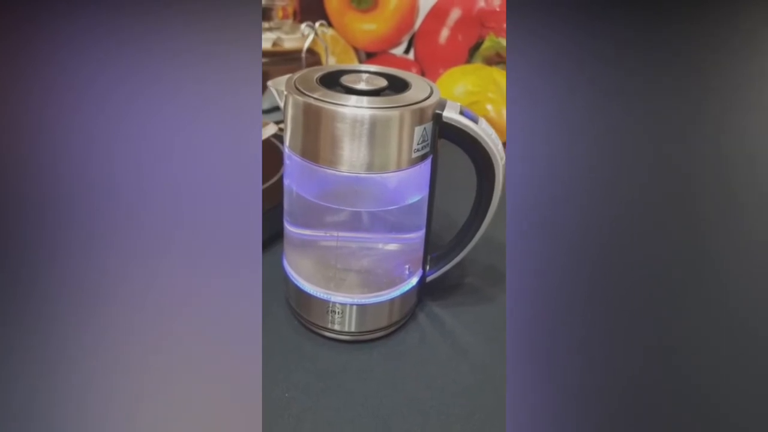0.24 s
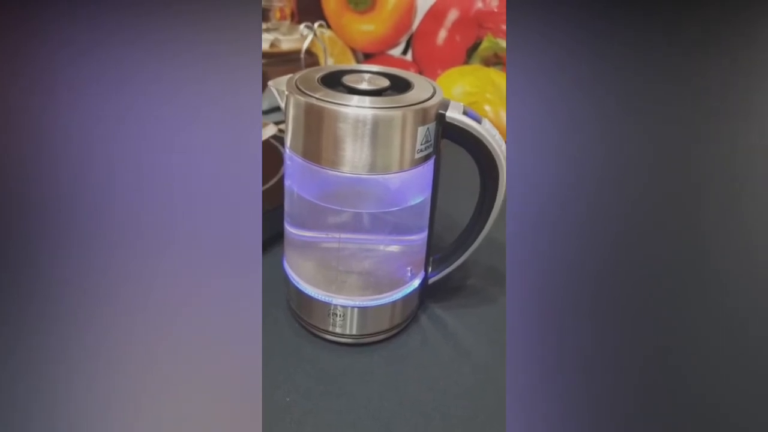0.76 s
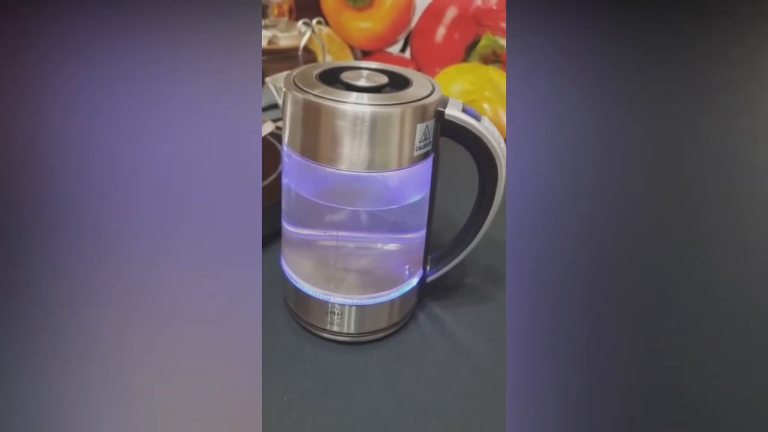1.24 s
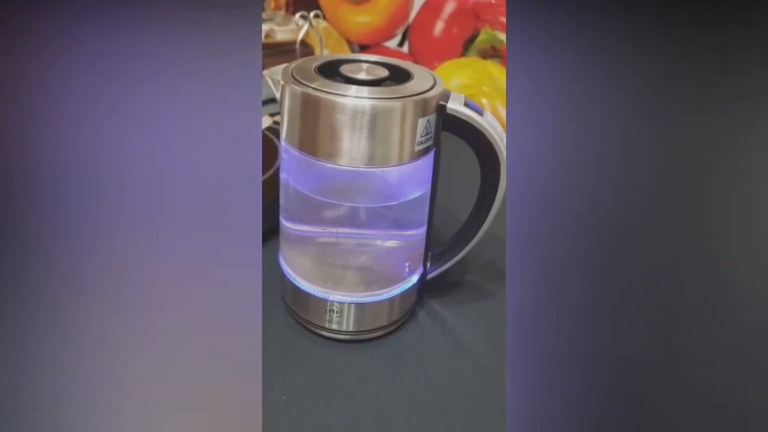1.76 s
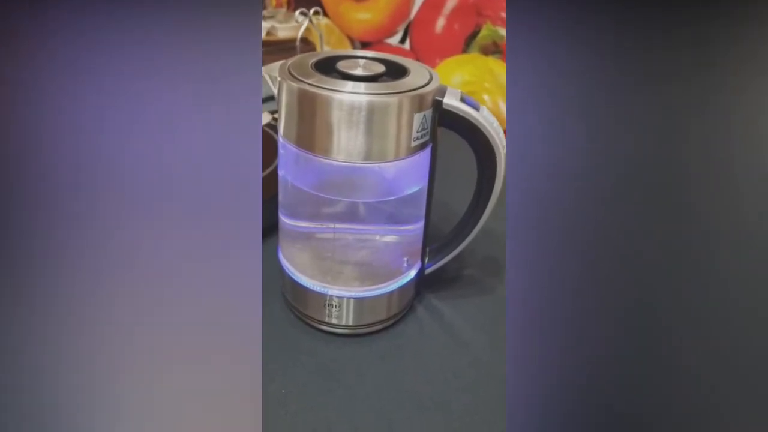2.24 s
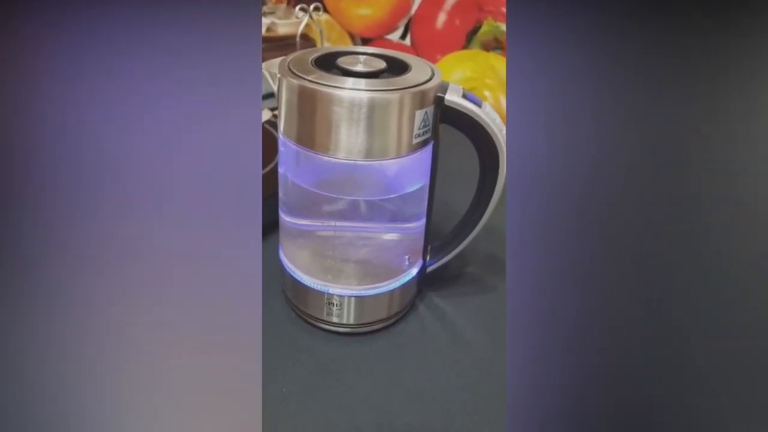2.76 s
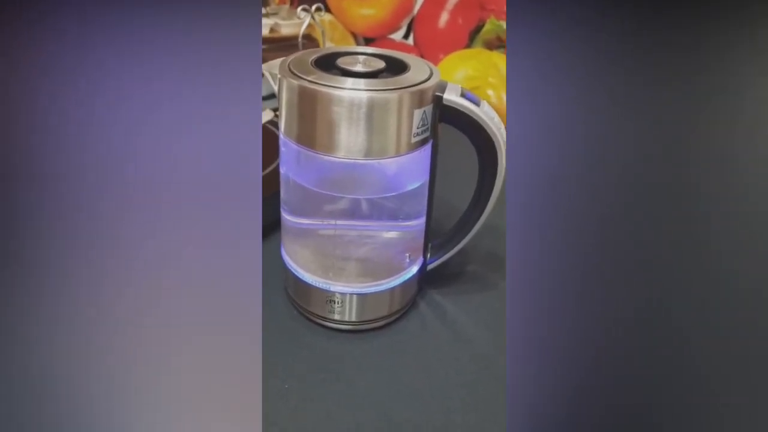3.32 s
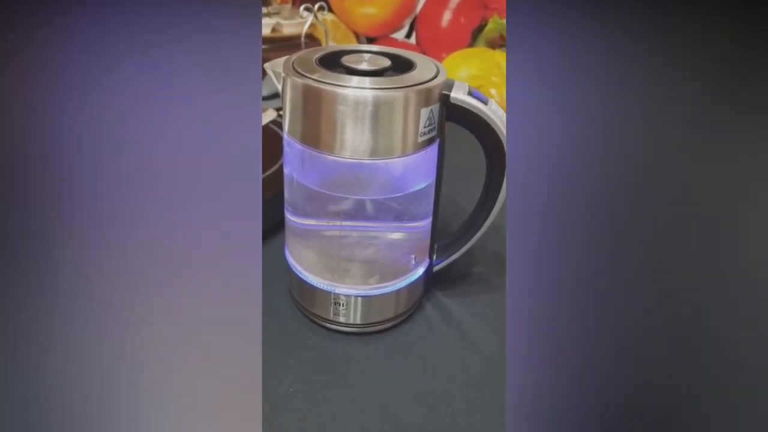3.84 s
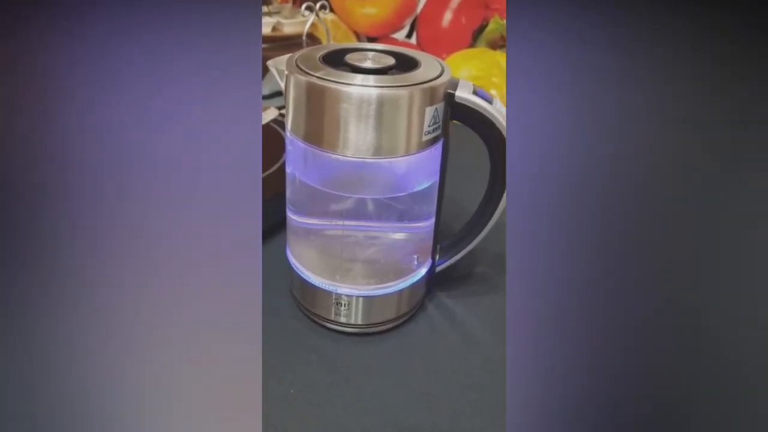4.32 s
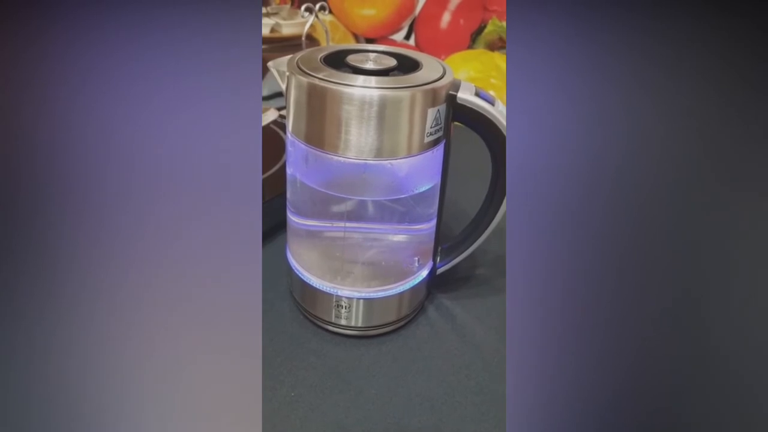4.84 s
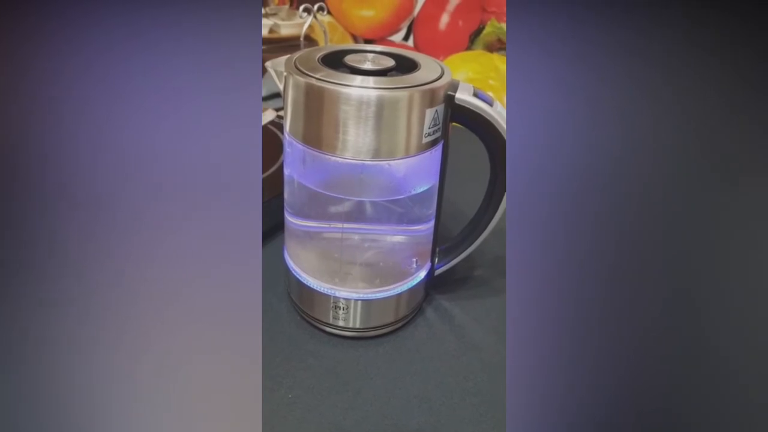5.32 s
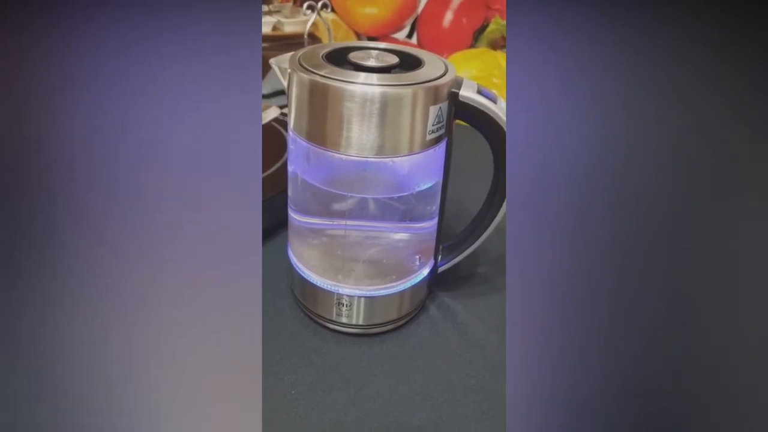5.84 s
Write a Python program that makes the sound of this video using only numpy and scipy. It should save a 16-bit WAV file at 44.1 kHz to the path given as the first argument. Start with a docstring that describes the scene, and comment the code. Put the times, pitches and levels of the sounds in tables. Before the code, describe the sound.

A glass electric kettle heats water on a table, heard close up in a quiet room. A dense, continuous rushing roar, strongest in the middle range, runs throughout without breaks or pitch change. Over it lies a fine, wide fizz of tiny bubbles that steadily fades, leaving the roar slightly fuller and duller. A very faint low room rumble sits underneath.

```python
"""A glass electric kettle heats water on a table, close to a phone in a quiet room.
Vapour bubbles collapse on the hot plate, tens of thousands a second: random clicks ring plate, water and jug.
At first a fine fizz of the smallest bubbles, filtered clicks in flickering bands, lies over the roar.
As the water warms, the fizz fades steadily and the roar's main resonance grows a little.
Echoes from near the kettle ripple the treble, and a faint low rumble of filtered noise lies beneath."""
import sys
import numpy as np
from scipy import signal
from scipy.fft import rfft, irfft
from scipy.io import wavfile
from scipy.ndimage import uniform_filter1d, map_coordinates

SR = 44100
rng = np.random.default_rng(int(sys.argv[2]) if len(sys.argv) > 2 else 0)


def generate_wav(sig):
    """Save sig (samples, or channels by samples) to the path in sys.argv[1] as 16-bit PCM at SR."""
    pcm = np.round(np.clip(np.atleast_2d(sig).T, -1, 1) * 32767).astype(np.int16)
    wavfile.write(sys.argv[1], SR, pcm)


N = 268083

OUTPUT_DB = -14.5
TOP_HZ = 15700


def undb(db):
    """Decibels to gain."""
    return 10 ** (np.asarray(db) / 20)


def bins():
    """Frequency in Hz of each bin of a whole-length spectrum."""
    return np.fft.rfftfreq(N, 1 / SR)


def across(rows):
    """The columns of a table at every bin, joined on a log frequency axis."""
    hz, *columns = np.transpose(rows)
    return [np.interp(np.log(bins() + 1), np.log(hz), column) for column in columns]


def colour(x, rows):
    """Give a sound a smooth spectrum."""
    gain = undb(across(rows)[0])
    return irfft(rfft(x) * gain, N)


def ring(x, modes, base):
    """Ring steep-sided resonances over a broad response; causal, so each click has a decaying tail."""
    power = undb(across(base)[0]) ** 2
    for hz, half_width, db in modes:
        peak = undb(db) / (1 + ((bins() - hz) / half_width) ** 2)
        power = power + peak ** 2
    # folding the cepstrum onto positive times gives the minimum-phase response
    cepstrum = irfft(np.log(power) / 2, N)
    fold = 1 + np.sign(np.fft.fftfreq(N))
    response = np.exp(rfft(cepstrum * fold))
    return irfft(rfft(x) * response, N)


def walk(rate):
    """Random levels held 1 / rate seconds and slewed twice, scaled to a spread of 1."""
    hold = max(int(SR / rate), 1)
    steps = np.repeat(rng.standard_normal(N // hold + 2), hold)
    smooth = uniform_filter1d(uniform_filter1d(steps, hold), hold)
    smooth = smooth[hold // 2:hold // 2 + N]
    return smooth / smooth.std()


def collapses(per_s, spread_db):
    """Clicks of collapsing bubbles at random moments and of random sizes; rms 1."""
    moments = rng.random(N) < per_s / SR
    sizes = rng.standard_normal(N) * undb(spread_db * rng.standard_normal(N))
    clicks = moments * sizes
    return clicks / clicks.std()


def warming(fizz_start_db=2, fizz_fade_db_per_s=0.9, drive_start_db=-1.14, drive_rise_db_per_s=0.4):
    """Warming water kills the smallest bubbles and lets larger ones drive the plate: two levels in dB."""
    t = np.arange(N) / SR
    fizz_db = fizz_start_db - fizz_fade_db_per_s * t
    drive_db = drive_start_db + drive_rise_db_per_s * t
    return fizz_db, drive_db


def roar(growth):
    """Dense collapses on the plate ring jug and wall; bigger bubbles sound duller."""
    # Modes of plate, water and jug, alike at both ears.
    # Each row: frequency in Hz, half width in Hz, relative level in dB.
    jug_modes = [(319, 43.7, -13), (392, 19, -24.5), (465, 21, -17.5), (716.5, 42.2, -7), (882, 35.8, -4),
                 (1031.7, 27.5, -2.5), (1086.5, 20.5, -2.5), (1163, 63, -1), (1283, 23, -2.6),
                 (1411, 119, -0.4), (1558, 23, -6), (1610, 25, -5.5), (1762, 43, -8.5), (1914, 86, -14),
                 (2193, 72, -8.5), (2410, 61, -11.5), (2496, 40, -6), (2628, 69, -8), (2809, 93, -9.5),
                 (2972, 30, -12), (3198, 57, -17), (3384, 62, -19), (3820, 71, -14.5), (4044, 62, -18.2),
                 (4270, 108, -16), (4657, 204, -18.5), (5477, 270, -21.5), (7050, 350, -23),
                 (7496, 113, -26)]
    # Broad response between those modes. Each row: frequency in Hz, relative level in dB.
    jug_base = [(60, -60), (150, -38), (200, -37), (300, -18.5), (600, -23.5), (1300, -56), (3600, -21),
                (5000, -45), (6300, -31), (8600, -40.5), (15500, -58)]
    # Wall modes that push opposite ways on the left and the right.
    # Each row: frequency in Hz, half width in Hz, relative level in dB.
    wall_modes = [(355, 80, -33), (660, 114, -36), (1066, 55, -23), (1254, 28, -17), (1370, 69, -17),
                  (1484, 49, -12), (1698, 68, -19), (2190, 55, -18), (2730, 84, -18), (2990, 44, -14),
                  (3339, 238, -22), (3708, 155, -24), (4361, 159, -22.5), (4860, 91, -23)]
    # Broad response between the wall modes. Each row: frequency in Hz, relative level in dB.
    wall_base = [(130, -59), (260, -48), (500, -40), (900, -54), (1800, -23), (4000, -32), (5500, -33.5),
                 (7200, -35), (9500, -47), (15500, -60)]
    # The kettle stands a little off centre, and each resonance radiates its own way.
    # Each row: frequency in Hz, left minus right in dB, lead of the left in radians.
    bearing = [(300, .3, -0.0041), (600, 0, -0.0077), (1130, 0.5, 0.045), (1260, -1.6, -0.28),
               (1420, -1.5, -0.48), (1510, 2.5, -0.82), (1620, -0.5, -.1), (1800, 1.5, -.6),
               (2190, 3.5, .3), (2530, .7, -.1), (3170, 6, .1), (4600, 1.5, 0), (6000, -5.5, 0),
               (7500, 3.5, -0.072)]

    clicks = collapses(per_s=36000, spread_db=0.36) * undb(0.088 * walk(40))
    # a small jug radiates almost no deep bass
    clicks = signal.sosfilt(signal.butter(2, 55, "high", fs=SR, output="sos"), clicks)
    sharp = signal.sosfilt(signal.butter(1, 2600, "high", fs=SR, output="sos"), clicks)
    clicks = clicks + (undb(-0.35 * growth) - 1) * sharp

    # where on the round plate a bubble bursts decides which way it rocks the wall
    place = np.sqrt(2) * np.cos(2 * np.pi * rng.random(N))
    jug = slosh(ring(clicks, jug_modes, jug_base))
    wall = ring(clicks * place, wall_modes, wall_base)

    ears = np.array([[1], [-1]])  # left, right
    pan_db, lead = across(bearing)
    panning = undb(ears * pan_db / 2) * np.exp(0.5j * ears * lead)
    return irfft(rfft(jug) * panning, N) + ears * wall


def slosh(x, shift_s=0.000249):
    """Moving water shifts the resonances by a percent or so, like a slowly changing delay."""
    positions = np.arange(N) + shift_s * SR * walk(9)
    return map_coordinates(x, [positions], order=5, mode="reflect")


def flurries(x, drive_db, flurry_db=1.2, plate_hz=1440, half_width_hz=180):
    """The larger bubbles collapse in short flurries that pump the plate's main resonance."""
    band = 1 / (1 + ((bins() - plate_hz) / half_width_hz) ** 4)
    plate = irfft(rfft(x) * band, N)
    return x + plate * (undb(drive_db + flurry_db * walk(45)) - 1)


def fizz(shared=0.088, flicker_db=0.84):
    """Tiny bubbles hiss, each size flickering on its own; the two ears hear them mostly unrelated."""
    # Hiss of the smallest bubbles at one ear. Each row: frequency in Hz, relative level in dB.
    hiss_colour = [(1500, -58), (5000, -26), (8600, -32.5), (11000, -32), (13600, -34), (15500, -32.5)]
    left, right, both = (collapses(per_s=32000, spread_db=0.9) for _ in range(3))
    ears = np.sqrt(1 - shared) * np.array([left, right]) + np.sqrt(shared) * both
    hiss = rfft(colour(ears, hiss_colour))
    # each bubble size has a band 2000 Hz wide, the last one open above 14000 Hz
    sizes = np.minimum(bins() // 2000, 7)
    return sum(irfft(hiss * (sizes == size), N) * undb(flicker_db * walk(30)) for size in np.unique(sizes))


def reflections(x, wet_db=-11, decay_s=0.014, above_hz=3200):
    """Hard things near the kettle throw back the treble, differently to each ear, and ripple its spectrum."""
    t = np.arange(SR // 16) / SR
    echoes = rng.standard_normal((2, len(t))) * np.exp(-t / decay_s)
    echoes /= np.sqrt(np.sum(echoes ** 2, axis=1, keepdims=True))
    wet = undb(wet_db) * bins() ** 4 / (bins() ** 4 + above_hz ** 4)
    # the division keeps the average power as it was
    response = (1 + wet * rfft(echoes, N)) / np.sqrt(1 + wet ** 2)
    return irfft(rfft(x) * response, N)


def room():
    """A faint low rumble of the room: noise with most of its level in the bass."""
    # Still air of the room at one ear. Each row: frequency in Hz, relative level in dB.
    rumble_colour = [(25, -36), (60, -43), (150, -44), (400, -50), (2000, -65)]
    return colour(rng.standard_normal((2, N)), rumble_colour)


def scene():
    """The kettle's roar and fizz, with their near echoes, over the quiet room."""
    fizz_db, drive_db = warming()
    # the fizz fades because the bubbles grow
    plate_roar = flurries(roar(growth=-fizz_db), drive_db)
    kettle = plate_roar + fizz() * undb(fizz_db)
    return undb(OUTPUT_DB) * (reflections(kettle) + room())


def record(dry):
    """The phone cuts the top with a steep low-pass."""
    return signal.sosfilt(signal.ellip(12, 0.1, 80, TOP_HZ, fs=SR, output="sos"), dry)


dry = scene()
out = record(dry)
generate_wav(out)
```